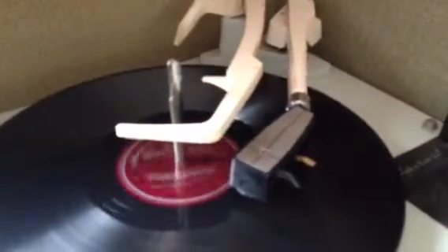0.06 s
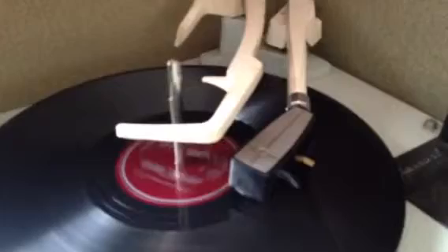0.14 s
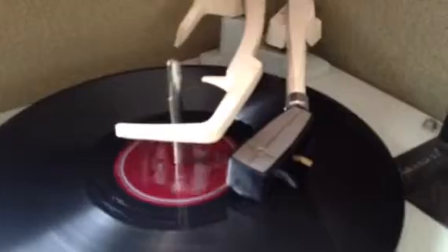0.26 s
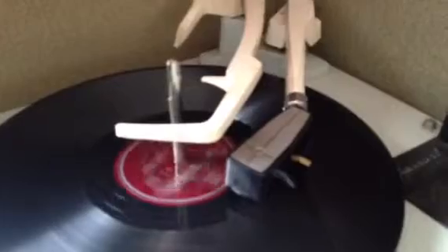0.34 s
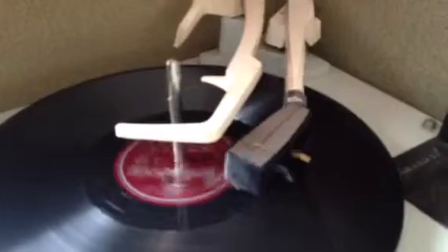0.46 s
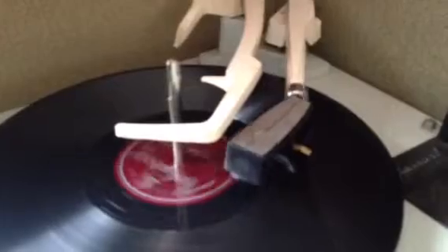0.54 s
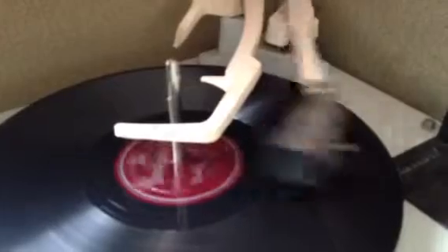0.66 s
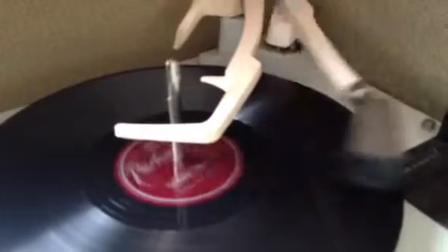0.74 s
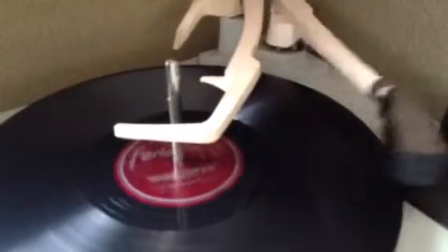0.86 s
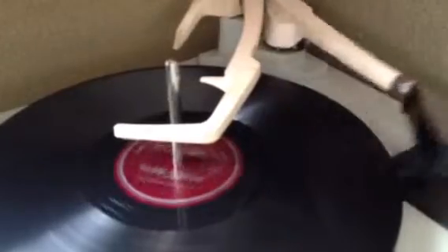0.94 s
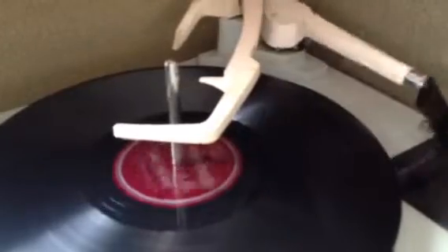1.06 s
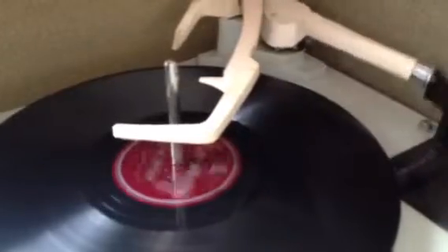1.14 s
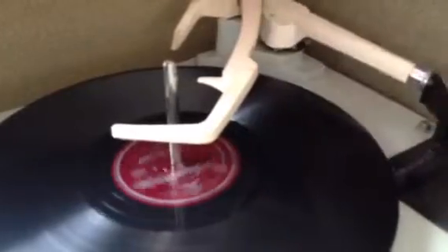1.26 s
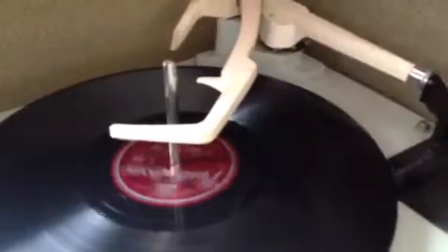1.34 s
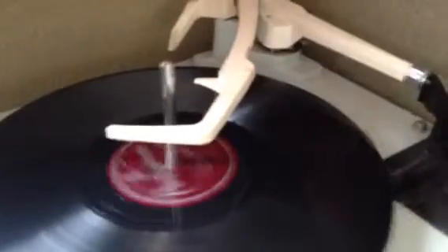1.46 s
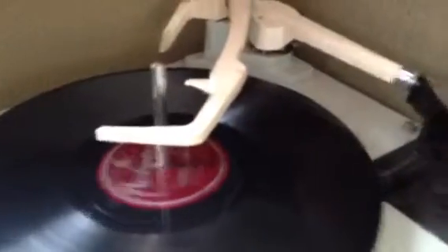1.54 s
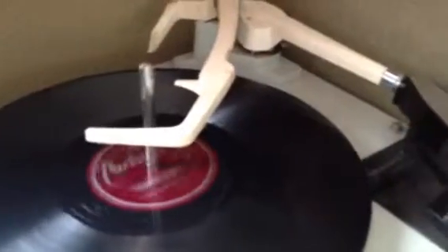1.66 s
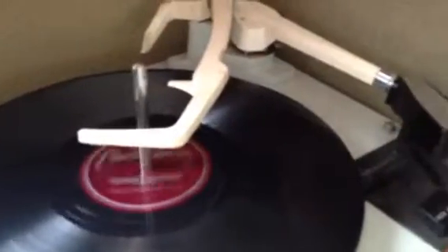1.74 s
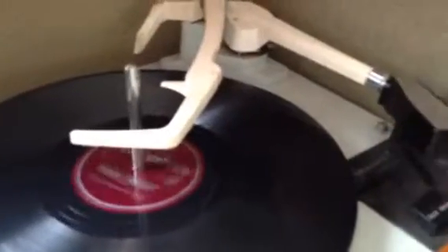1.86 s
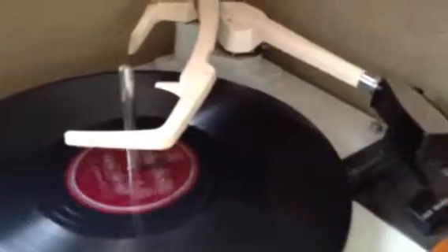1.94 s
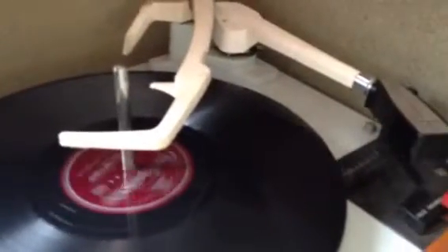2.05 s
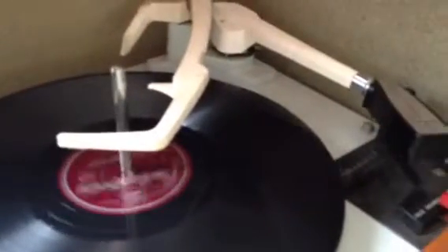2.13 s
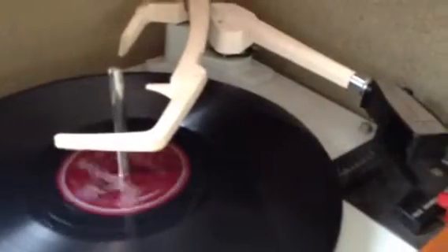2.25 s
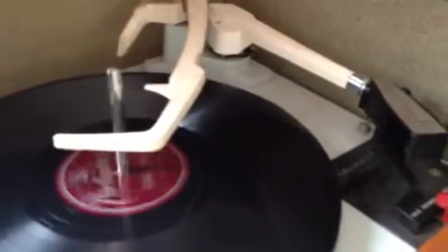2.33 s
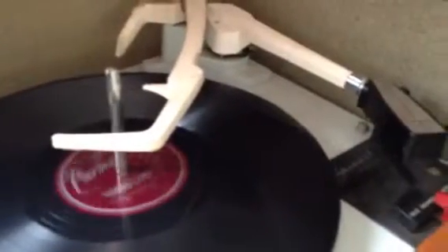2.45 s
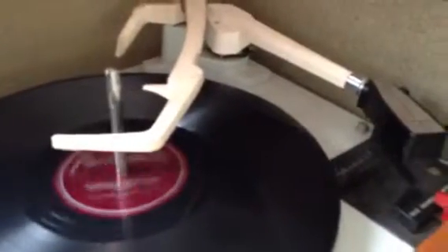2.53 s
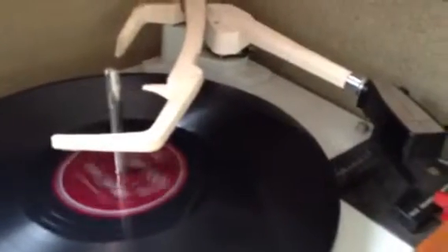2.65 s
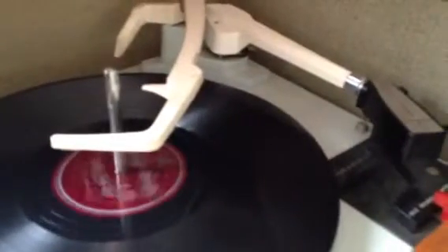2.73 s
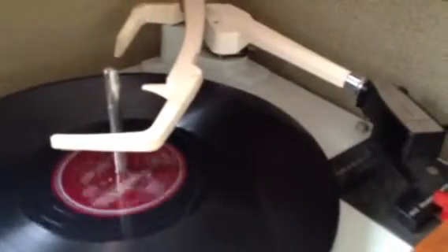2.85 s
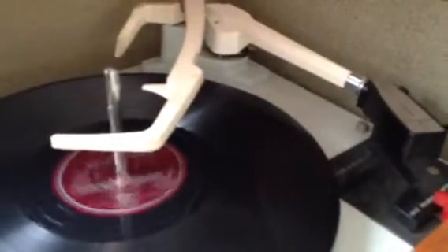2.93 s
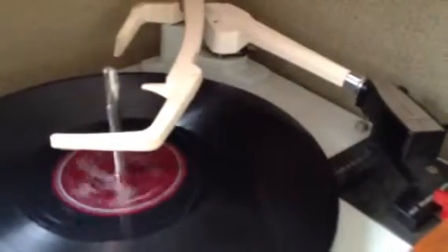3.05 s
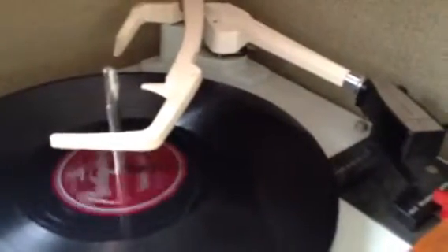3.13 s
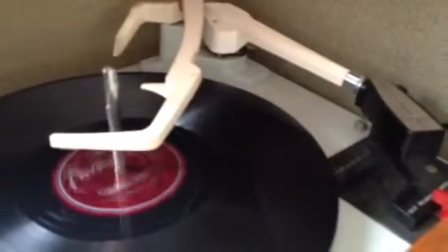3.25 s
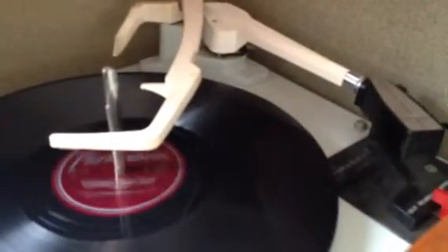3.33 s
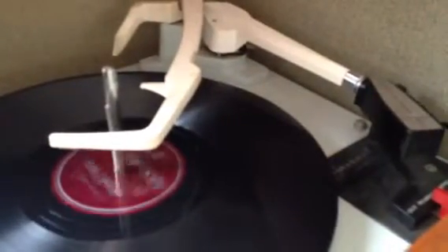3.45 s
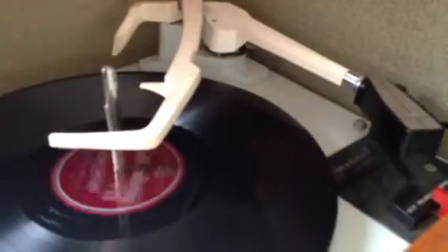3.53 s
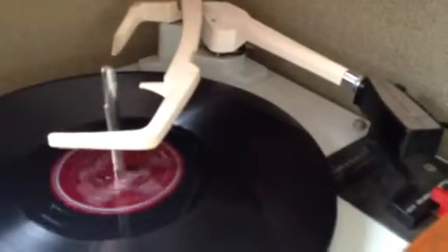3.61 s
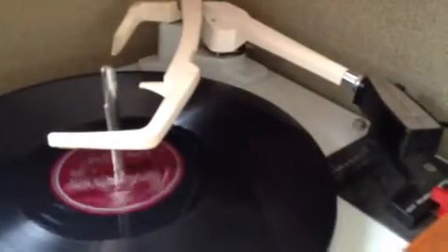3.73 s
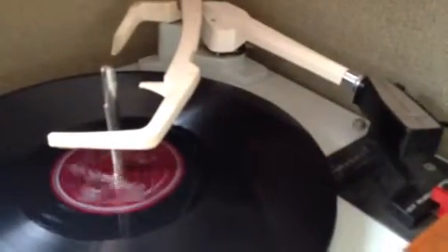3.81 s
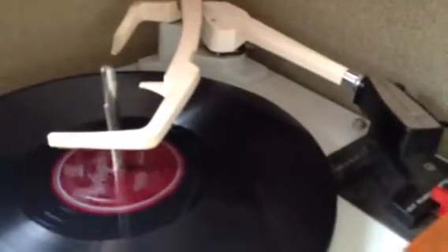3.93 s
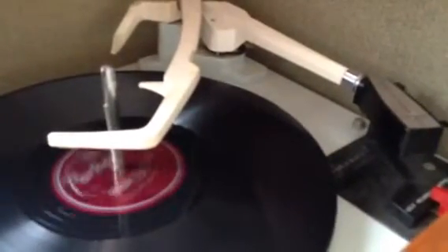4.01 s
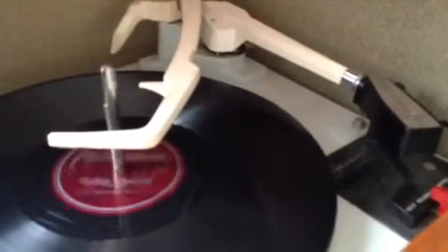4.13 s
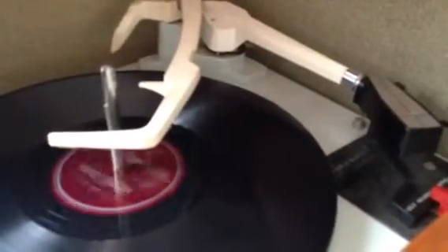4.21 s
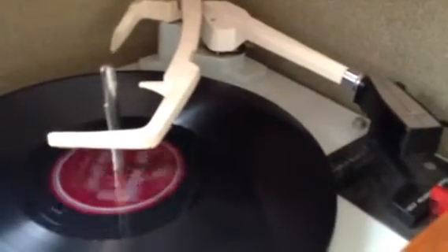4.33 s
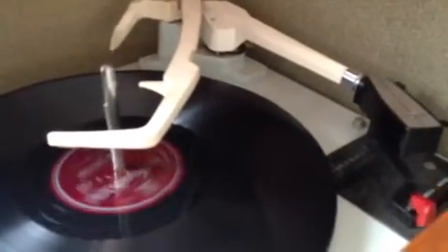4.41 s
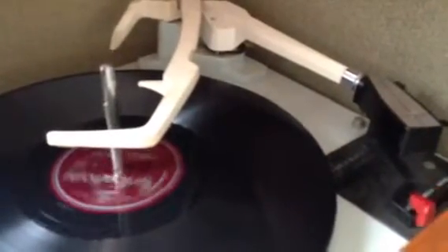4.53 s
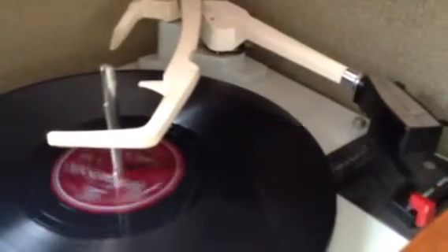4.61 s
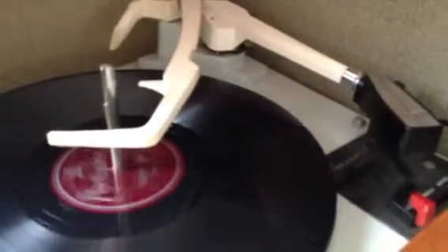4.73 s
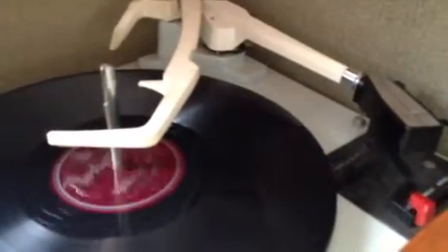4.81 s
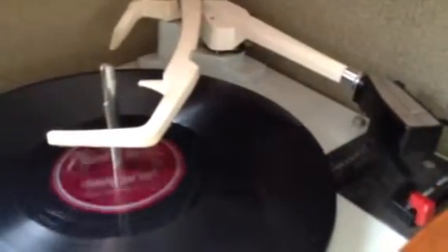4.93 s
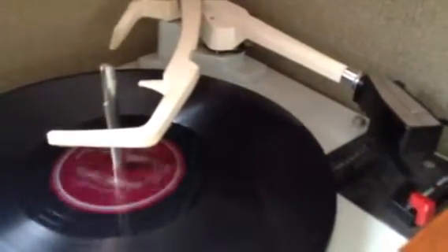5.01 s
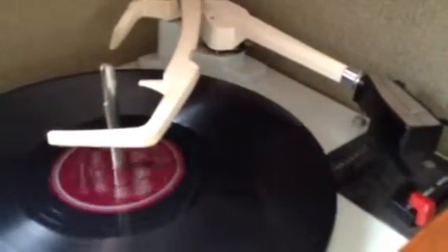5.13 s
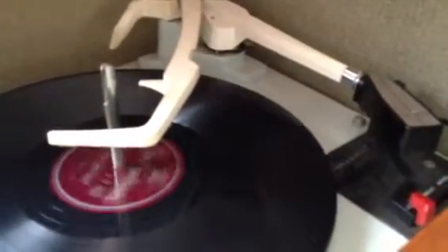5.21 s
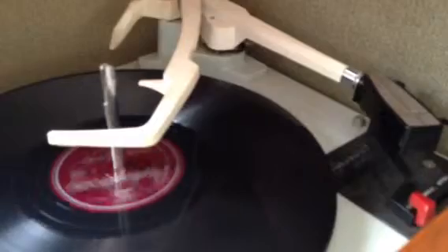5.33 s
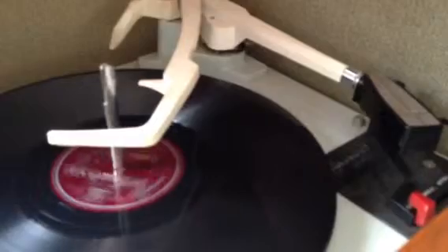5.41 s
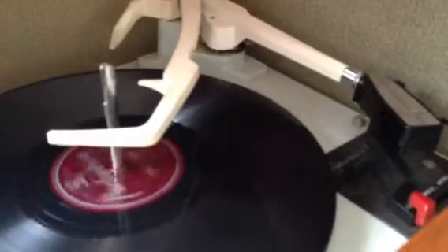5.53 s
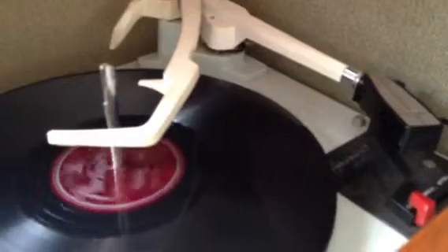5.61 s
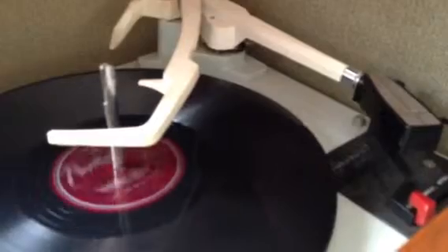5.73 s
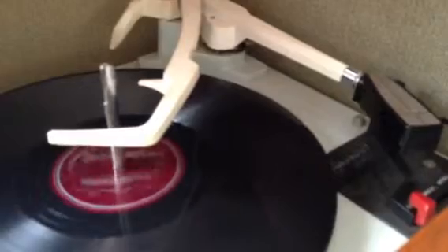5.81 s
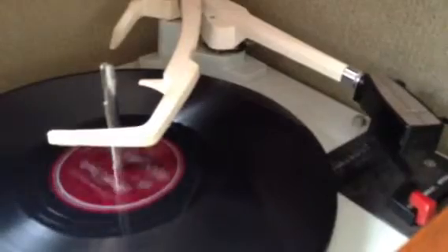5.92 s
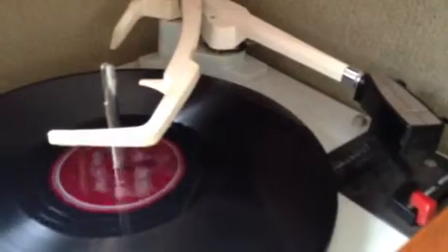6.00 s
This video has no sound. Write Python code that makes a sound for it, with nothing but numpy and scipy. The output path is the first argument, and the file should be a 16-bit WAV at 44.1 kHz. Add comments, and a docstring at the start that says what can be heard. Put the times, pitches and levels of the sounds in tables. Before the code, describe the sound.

A record changer clicks and clacks as its arm lifts and swings back, its gear ticking until a loud double clack switches it off.

```python
"""In a small room, close to the microphone, a record changer ends a side and shuts itself off.
Friction makes the stylus hiss in the last groove. The cam gear ticks by tooth impact while levers lift
the arm, swing it out and set it down, each blow exciting the modes of the deck. A double clack throws
the switch and leaves the springs in free vibration. Under it lie mains hum, a thin buzz and room air."""
import sys
import numpy as np
from scipy import signal
from scipy.fft import rfft, irfft, next_fast_len
from scipy.io import wavfile
from scipy.ndimage import uniform_filter1d

SR = 44100
rng = np.random.default_rng(int(sys.argv[2]) if len(sys.argv) > 2 else 0)


def digitize_waveform(pressure):
    """Quantize a signal to 16-bit integers and store it at the path in sys.argv[1].

    Rows of a 2-D input are taken as channels; values are limited to [-1, 1].
    """
    field = np.atleast_2d(pressure).T
    bounded = np.clip(field, -1, 1)
    quanta = np.round(bounded * 32767).astype(np.int16)
    wavfile.write(sys.argv[1], SR, quanta)


N = 267543
TIME = np.arange(N) / SR
SWITCH_S = 4.514

# Lever and latch impacts, with a few hard catches of the cam gear's teeth; thud (bass), fizz (treble) and ring
# are relative to the level: # t/s, level/dB, t60/s, thud/dB, fizz/dB, ring f/Hz, ring/dB
BLOWS = [(0.106, -12.5, .04, 7, -14, 4044, 12.5), (0.1107, 3.5, 0.033, 0, -3, 3923, 11),
         (0.1555, 4, 0.04, 1.5, -25.5, 1815, 12.5), (0.218, -17, .036, 0, -14.5, 3743, 14.5),
         (0.241, -9, 0.055, 5.5, -23, 1898, 8.5), (0.358, -1.5, .045, -4.5, -28.5, 3530, 9.5),
         (0.39, -9, .028, -4.5, -10.5, 6285, 21.5), (0.721, 3, .045, -11, -35.5, 1205, 8.5),
         (0.8, -8, .04, 1, -23, 1830, 16.5), (0.827, 22, .028, -15.5, -22, 6048, 12),
         (1.108, 3.5, .04, 5, -20, 1172, 12.5), (1.202, -11, 0.065, 10, -28, 1144, 15),
         (1.2233, 10, 0.04, -5.5, -6, 9610, 7.5), (1.243, 7.5, .085, -5.5, -21.5, 1195, 9),
         (1.2581, 18.5, .043, -7.5, -14.5, 2450, 0.5), (1.3467, 5.5, 0.051, -5.5, -8, 1229, 10.5),
         (1.378, 3.5, .04, -7, -12.5, 4778, 8), (1.395, -14, .03, 14.5, -32.5, 1134, 8.5),
         (1.5119, -19.5, 0.032, 2, -39.5, 2325, 16), (1.5893, -17.5, .055, 2.5, -31.5, 2338, 4.5),
         (1.6352, -13, .052, 8, -18.5, 2378, 16), (1.9705, -26, 0.039, 0.5, -15.5, 2400, 9.5),
         (2.0325, 2.5, .026, -13, -26, 1184, 9.5), (2.6763, -7, 0.031, -0.5, -6, 2373, 11.5),
         (2.936, -26.5, .05, 4.5, -34.5, 1905, 7.5), (3.131, -25, .05, 4, -33.5, 1828, 8),
         (3.8418, 1, .054, -18.5, -16, 1801, 13.5), (3.861, 4, .105, -20.5, -29.5, 2494, -1),
         (3.9306, -13.5, 0.046, -2, -18.5, 2280, 11.5), (3.9749, -16.5, .045, 0, -38.5, 2263, 2.5),
         (4.022, -7.5, .036, -11.5, -24, 2437, 5.5), (4.138, -22, .045, -0.5, -47, 2536, 6),
         (4.181, -23, 0.041, 0, -42.5, 1801, 7), (4.321, -17.5, .042, -2, -29.5, 3362, 10.5),
         (4.3647, -28, .045, 12.5, -0.5, 1814, 4), (4.4267, -16, .05, 4, -30, 3253, 8),
         (4.464, -27, .04, 4, -4.5, 2888, 8), (4.477, -17.5, .07, 10.5, -7, 3194, 4),
         (4.4868, 18.5, .058, -8, -4, 1792, 6), (4.5167, 20, .07, -5.5, 0.5, 2533, 7.5),
         (4.575, -4, 0.24, 2.5, -1, 1898, 7.5), (4.6341, -1.5, .075, 2, -8.5, 3647, 4.5)]
# Centres of the thud, knock, reference, edge and fizz bands: f/Hz
IMPACT_BANDS = [330, 900, 2700, 7000, 12500]
def levers(contact_s=.0006):
    """Impact excitation: each blow rattles a lever or gear tooth and drives the deck, harder for a longer
    contact."""
    out = np.zeros(N)
    for s, db, t60, thud, fizz, ring_hz, ring_db in rebounds(BLOWS):
        looseness = t60 / .05
        rise = .0012 * looseness ** 1.4  # a looser part builds up more slowly
        knock, edge = .82 * thud - 1.5, .44 * fizz - .66
        bands = zip(IMPACT_BANDS, [thud, knock, 0, edge, fizz])
        colour = [(30, thud - 30), (120, thud - 19), (250, thud - 11), *bands, (16000, fizz - 3)]
        add(out, s - contact_s, amp(db) * rattle(t60, rise + contact_s, colour, ring_hz, ring_db, q=25))
        force = [(hz, level - .23 * np.log2(hz / IMPACT_BANDS[2])) for hz, level in colour]
        lever_mode = (ring_hz, ring_db - 4, .13)
        add(out, s + rise, amp(db) * looseness ** .42 * deck(force, lever_mode))
    return out


def rebounds(blows, hard_db=8):
    """Inelastic collision: yields every blow, and after a hard one a weaker, duller, looser bounce."""
    for s, db, t60, thud, fizz, *ring in blows:
        yield s, db, t60, thud, fizz, *ring
        if db > hard_db:
            yield s + .25 * t60, db - 8, t60 * 1.55, thud + 4.5, fizz - 4, *ring


def rattle(t60, rise, spectrum, ring_hz, ring_db, q, size=8192):
    """Modal overlap: the dense modes of a struck part decay as noise, with one resonance standing out."""
    t, hz = np.arange(size) / SR, np.fft.rfftfreq(2 * size, 1 / SR)
    attack = 1 - np.exp(-(t / rise) ** 2)
    modes = rfft(rng.standard_normal(size) * attack * amp(-60 * t / t60), 2 * size)
    modes /= np.sqrt(uniform_filter1d(abs(modes) ** 2, size=36) + 1e-12)  # a blow feeds all modes evenly
    resonance = 1 + (amp(ring_db) - 1) / (1 + 1j * q * (hz / ring_hz - ring_hz / (hz + 1)))
    return irfft(modes * resonance * amp(read(spectrum, hz)))[:size] * attack


# Modes of the deck plate, then of its long-ringing springs: f/Hz, level/dB re the force, t60/s
DECK_MODES = [(365, -3, .15), (485, 5, .16), (820, 2, .2), (965, -2, .12), (1206, 1, .22), (1534, 0, .18),
              (1694, 0, .15), (1883, 3.5, .18), (2261, 1.5, .13), (2425, 1, .12), (2517, 4, .18),
              (2751, 3.5, .18), (3157, 1, .13), (3277, 1, .13), (3810, 2, .16), (4086, 1, .13),
              (6107, 6, .07), (11580, 4, .06), (12723, 1, .12), (12946, 2.5, .12), (13203, 2, .1),
              (13586, 2.5, .12), (274, -1, 1.8), (447, -5, 1.3), (1204, -9, 1.5), (1620, -15, 1.3),
              (2266, -14, 1.4), (2401, -11, 1.5), (2519, -11, 1.5), (2826, -14, 1.5)]
def deck(force, lever_mode):
    """Modal superposition: deck and lever ring on, each mode in proportion to the force at its pitch."""
    ring = np.zeros(2 * SR)
    for hz, db, t60 in [*DECK_MODES, lever_mode]:
        t = np.arange(int(t60 * SR)) / SR
        damping = np.log(1000) / t60
        height = amp(db + read(force, hz)) * 2 * damping / SR
        ring[:len(t)] += height * np.exp(-damping * t) * np.sin(2 * np.pi * (hz * t + rng.random()))
    return ring


def spring_ping():
    """Free vibration: a small spring rings as the arm swings out."""
    out = np.zeros(N)
    add(out, .828, damped_note(db=-37.5, hz=6158, t60=.27, rise=.0006))
    return out


# Pace as the cam lifts the arm, swings it, meets the stop and runs free: start t/s, end t/s, teeth/s
TOOTH_RATE = [(0.441, 0.9, 24.9), (0.938, 1.48, 23.6), (1.548, 1.89, 22.0), (1.914, 4.45, 25.57)]
# How hard the teeth catch: t/s, level/dB
TOOTH_LOAD = [(.44, -26), (.56, -21.5), (1.02, -20.5), (1.5, -20.5), (1.9, -31), (2.33, -28.5),
              (2.8, -31.5), (3.06, -23), (3.2, -29.5), (3.38, -25.5), (3.72, -32), (4.4, -26)]
# Spectrum of one tooth impact: f/Hz, level/dB
TOOTH_SPECTRUM = [(150, -3.5), (400, 7), (800, 2), (1200, -0.5), (2100, -1), (3500, -8), (6000, -18),
                  (10000, -27.5), (16000, -21.5)]
def cam_gear(uneven_db=3.96, jitter_s=.0012):
    """Gear meshing: a nearly periodic train of impacts, harder under load and no two alike."""
    out = np.zeros(N)
    for start, end, per_s in TOOTH_RATE:
        for s in np.arange(start, end, 1 / per_s):
            late, force, pitch = rng.standard_normal(3)
            db = np.interp(s, *np.transpose(TOOTH_LOAD)) + uneven_db * force
            ring_hz = 1950 * np.exp(.16 * pitch)
            tick = rattle(t60=.062, rise=.0015, spectrum=TOOTH_SPECTRUM, ring_hz=ring_hz, ring_db=7, q=9)
            add(out, s + jitter_s * late, amp(db) * tick)
    return out


# Soft bumps of the sprung deck: t/s, level/dB, f/Hz
DECK_BUMPS = [(0.111, -34, 280.8), (0.123, -45.5, 135.5), (0.156, -38.5, 206.1), (0.336, -49, 203),
              (0.546, -48, 121), (1.108, -34, 269.4), (1.111, -39.5, 209.5), (1.835, -47.5, 428),
              (2.034, -38.5, 351.2), (3.039, -44.5, 419), (3.423, -45.5, 292), (4.518, -30, 338.2),
              (4.637, -46, 436.3), (5.466, -55.5, 128.9), (5.475, -53, 291)]
def suspension(sways_per_s=1.6, decay_cycles=22):
    """Mass-spring oscillation: the deck rocks with low, brief notes; the switch gives one deep jolt."""
    out = np.zeros(N)
    draws = rng.random((round(sways_per_s * N / SR), 3))
    faint_sways = [(when * N / SR, -58.5 + 3 * (2 * force - 1), 297 * 2 ** (.6 * (2 * pitch - 1)))
                   for when, force, pitch in draws]
    for s, db, hz in DECK_BUMPS + faint_sways:
        add(out, s, damped_note(db, hz, decay_cycles / hz))
    add(out, SWITCH_S, damped_note(db=-27, hz=70.5, t60=.03))
    return out


# Spectrum of the groove's surface noise: f/Hz, level/dB
GROOVE_SPECTRUM = [(300, -0.5), (1500, -7), (3500, -4), (5000, 0.5), (6300, 1.5), (7500, -12), (10000, -6),
                   (13000, -7), (15000, 2), (16000, -2)]
def stylus(level_db=-60.5, crackle_db=3, lift_s=.535):
    """Friction noise: the stylus gives a grainy hiss, drags briefly and falls silent as the arm lifts."""
    grains = rng.standard_normal(N) * amp(crackle_db * np.minimum(rng.exponential(1, N), 6))
    scrape_db = 5.5 * np.exp(-((TIME - .338) / .03) ** 2)
    lift_db = 1200 * np.clip(TIME - lift_s, 0, 1)
    return coloured(grains, GROOVE_SPECTRUM) * amp(level_db + scrape_db - lift_db)


# Spectrum of the sliding cam and wheels: f/Hz, level/dB
RUB_SPECTRUM = [(150, -15), (300, -1), (480, 0), (850, -3), (1300, -7), (2300, -9), (3800, -12),
                (6000, -18), (15000, -28)]
def drive(level_db=-68.5, onset_s=.32, coast_db_per_s=15.5):
    """Sliding friction: cam and wheels rub unevenly and sing until the switch opens, then coast."""
    coast_db = coast_db_per_s * np.maximum(TIME - SWITCH_S - .21, 0)
    rub = coloured(rng.standard_normal(N), RUB_SPECTRUM) * amp(level_db - coast_db + .93 * drift(30))
    whine = amp(-81) * narrowband(hz=2280, per_s=110) * (TIME < SWITCH_S)
    return (rub + whine) * np.minimum(TIME / onset_s, 1)


# Partials of the motor hum: f/Hz, relative level/dB
HUM_PARTIALS = [(99.8, -67.5), (200.5, -79.5)]
def motor_hum(waver_rad=.2, flutter_db=2.07):
    """Forced vibration: the mains drives the motor at two partials that waver in phase and level."""
    hum = sum(amp(db) * np.sqrt(2) * np.sin(2 * np.pi * hz * TIME + waver_rad * drift(3.5))
              for hz, db in HUM_PARTIALS)
    return hum * amp(flutter_db * drift(2.8) - 1)


# Bands of the buzz: f/Hz, level/dB
BUZZ_BANDS = [(1700, -88.5), (2270, -87.5), (3880, -90.5), (5356, -83.5), (6115, -84.5), (6955, -93),
              (8742, -87), (9781, -83), (10860, -86), (12030, -83), (13146, -99.5), (14500, -89)]
# Spells of the buzz: start t/s, end t/s, gain/dB
BUZZ_SPELLS = [(0, 5.1, -6), (4.88, 5.3, -0.5), (5.5, 5.62, 3.5), (5.93, 6.3, 6)]
def buzz(fade_s=.059):
    """Narrow-band noise: a cluster of fuzzy high tones makes a thin buzz that comes and goes."""
    tones = sum(amp(db) * narrowband(hz, per_s=220) for hz, db in BUZZ_BANDS)
    spells = sum(amp(db) * np.clip(np.minimum(TIME - start, end - TIME) / fade_s + .5, 0, 1)
                 for start, end, db in BUZZ_SPELLS)
    return tones * spells


# Spectrum of the still room: f/Hz, level/dB
AIR_SPECTRUM = [(20, -23), (45, 0), (75, -9.5), (120, -6), (165, -11.5), (280, -6), (450, -16.5),
                (560, -18), (900, -19.5), (1400, -28.5), (4400, -32.5), (9000, -36.5), (15500, -41)]
# Course of the room noise: t/s, level/dB
AIR_LEVEL = [(0, -65), (2, -70.5), (4.7, -72.5), (5.4, -67)]
def room_air():
    """Ambient noise: a broadband floor, strongest in the bass, that sinks slowly and rises again."""
    return coloured(rng.standard_normal(N), AIR_SPECTRUM) * amp(np.interp(TIME, *np.transpose(AIR_LEVEL)))


# Peaks and hollows in the plinth's response: f/Hz, bandwidth/Hz, gain/dB
PLINTH_BANDS = [(529, 40, -10), (776, 60, -1), (1180, 230, -0.5), (1310, 62, -11.5), (2070, 120, -12.5),
                (2150, 250, 1.5), (2710, 330, -5.5), (3490, 520, 0.5), (7240, 2300, -2)]
def plinth(x):
    """Resonance and antiresonance: the box under the deck lifts some bands and swallows others."""
    for hz, width, db in PLINTH_BANDS:
        x = x + (amp(db) - 1) * signal.lfilter(*signal.iirpeak(hz, hz / width, fs=SR), x)
    return x


# Reverberation time of the room: f/Hz, t60/s
ROOM_DECAY = [(150, 0.15), (600, 0.33), (2500, 0.17), (6000, 0.15), (11000, 0.2), (16000, 0.26)]
def room(x, wet_db=-12, build_s=.0017):
    """Reverberation: diffuse reflections build up behind the direct sound; the low mids last longest."""
    hz, t, noise = signal.stft(rng.standard_normal(SR), SR, nperseg=256)
    decay = amp(-60 * t / read(ROOM_DECAY, hz)[:, None])
    tilt = amp(read([(3000, .0064), (12000, -2)], hz))[:, None]
    tail = signal.istft(noise * decay * tilt * np.minimum(t / build_s, 1), SR, nperseg=256)[1]
    return x + amp(wet_db) * signal.fftconvolve(x, tail / np.linalg.norm(tail))[:N]


def damped_note(db, hz, t60, rise=.001):
    """Damped oscillation: one sinusoid rises quickly and decays exponentially."""
    t = np.arange(SR // 2) / SR
    return amp(db) * np.exp(-np.log(1000) * t / t60) * (1 - np.exp(-t / rise)) * np.sin(2 * np.pi * hz * t)


def narrowband(hz, per_s):
    """Random modulation: a tone wanders in level and phase."""
    return ((drift(per_s) + 1j * drift(per_s)) * np.exp(2j * np.pi * hz * TIME)).real


def drift(per_s):
    """Linear interpolation of per_s random values a second, at unit rms."""
    return unit(np.interp(TIME * per_s, np.arange(N // 50), rng.standard_normal(N // 50)))


def coloured(x, spectrum):
    """Spectral shaping of a signal, at unit rms."""
    size = next_fast_len(N)
    gain = amp(read(spectrum, np.fft.rfftfreq(size, 1 / SR)))
    return unit(irfft(rfft(x, size) * gain, size)[:N])


def read(points, hz):
    """Interpolation of a table on a log-frequency axis."""
    f, value = np.transpose(points)
    return np.interp(np.log(hz + 1), np.log(f), value)


def amp(db):
    """Amplitude ratio of a level in decibels."""
    return 10 ** (np.asarray(db) / 20)


def unit(x):
    """Normalisation to unit rms."""
    return x / np.sqrt(np.mean(x ** 2) + 1e-20)


def add(mix, s, sound):
    """Superposition of a sound on the mix at time s."""
    part = mix[max(round(s * SR), 0):][:len(sound)]
    part += sound[:len(part)]


def scene():
    """Source and path: the mechanism sounds through the plinth into the room, over the quiet layers."""
    machine = plinth(levers() + spring_ping() + cam_gear() + drive()) + suspension()
    return (room(machine) + stylus() + motor_hum() + buzz() + room_air())[None]


def record(dry, threshold_db=-24, squeeze=.21, recover_db_per_s=7, low_hz=38, high_hz=15500):
    """Compression and band limiting: the gain ducks at the loudest clacks and slowly recovers."""
    power_db = 10 * np.log10(abs(uniform_filter1d(dry[0] ** 2, size=220)) + 1e-12)
    excess_db = np.maximum(power_db - threshold_db, 0)
    recovery_db = TIME * recover_db_per_s
    cut_db = np.maximum.accumulate(squeeze * excess_db + recovery_db) - recovery_db
    ducked = dry * amp(-uniform_filter1d(cut_db, size=100))
    highpassed = signal.lfilter(*signal.butter(6, low_hz, "high", fs=SR), ducked)
    lowpass = signal.firwin(401, high_hz, window=("kaiser", 6), fs=SR)
    return signal.oaconvolve(highpassed, lowpass[None], "same")


dry = scene()
out = record(dry)
digitize_waveform(out)
```